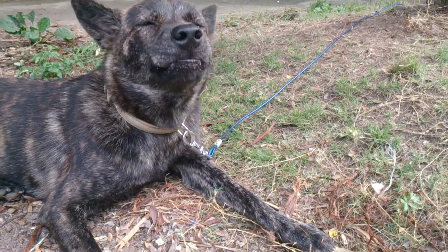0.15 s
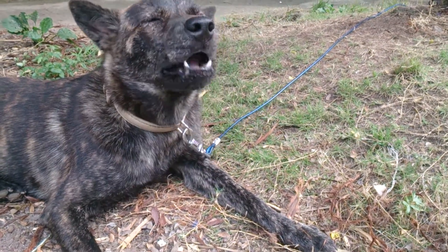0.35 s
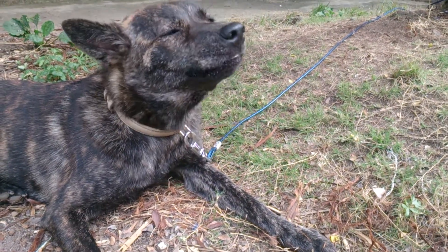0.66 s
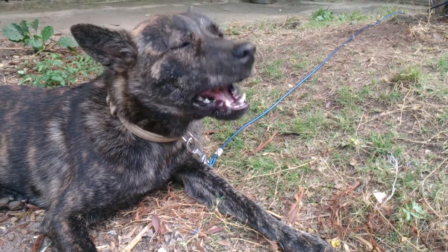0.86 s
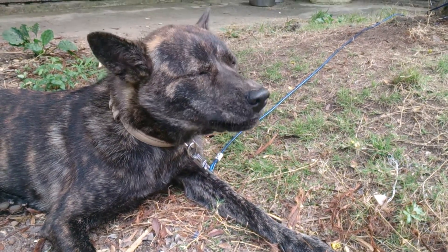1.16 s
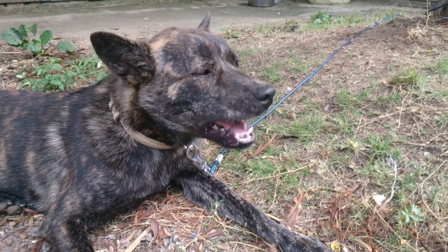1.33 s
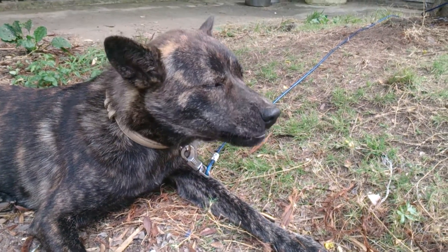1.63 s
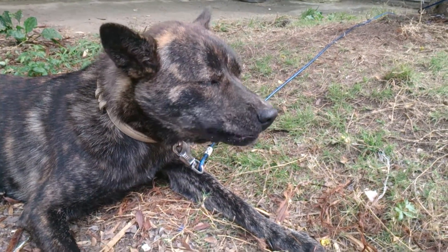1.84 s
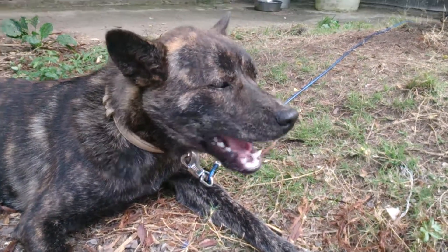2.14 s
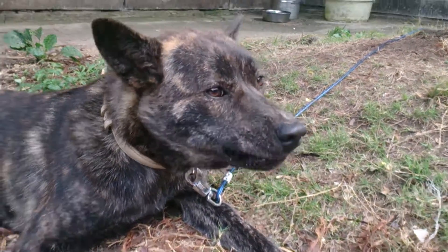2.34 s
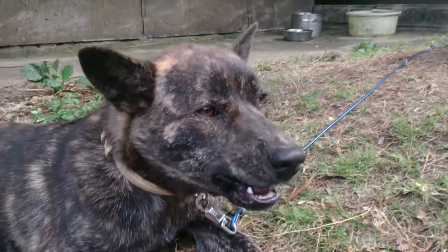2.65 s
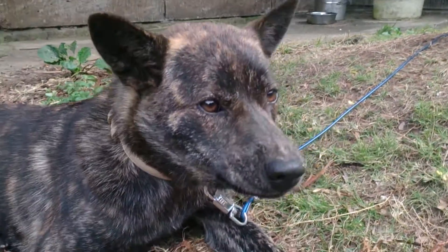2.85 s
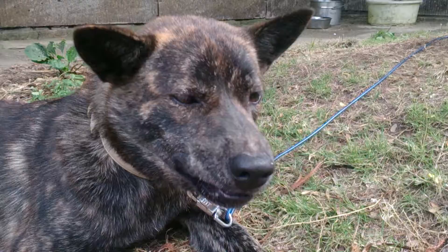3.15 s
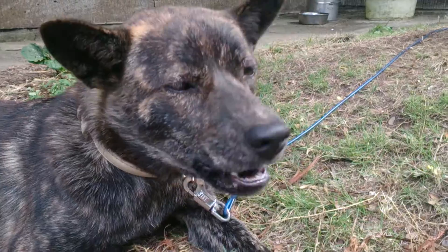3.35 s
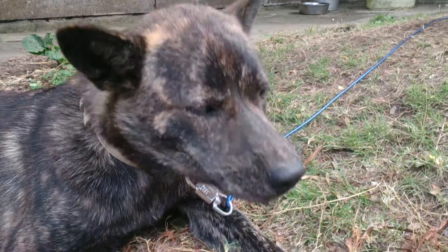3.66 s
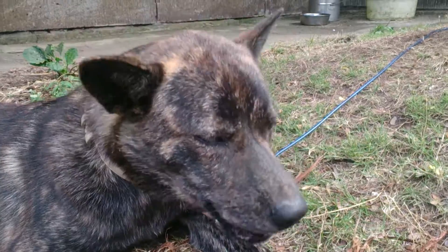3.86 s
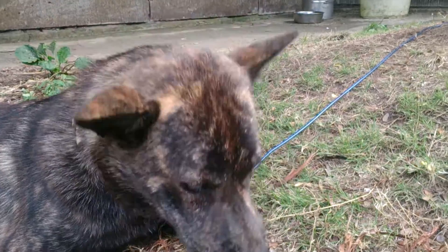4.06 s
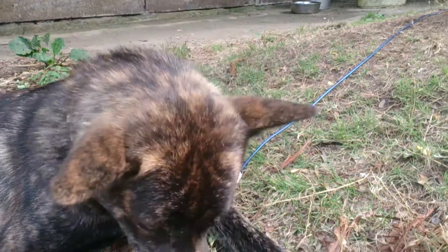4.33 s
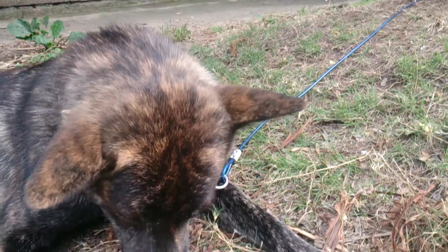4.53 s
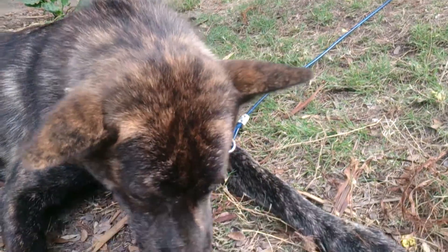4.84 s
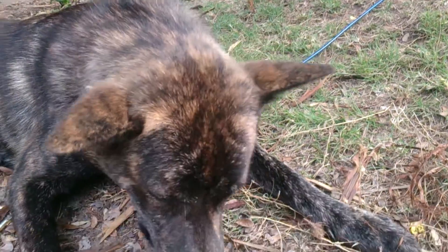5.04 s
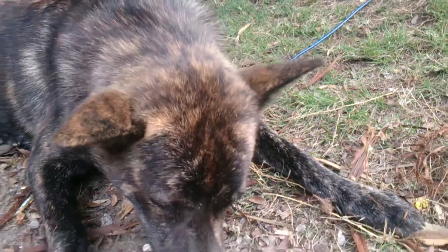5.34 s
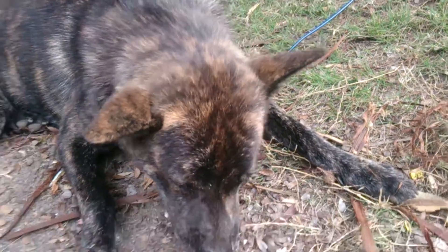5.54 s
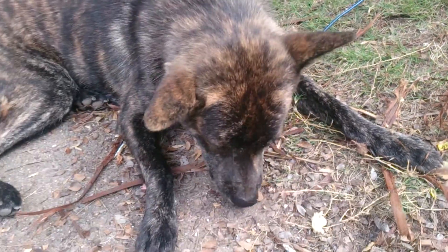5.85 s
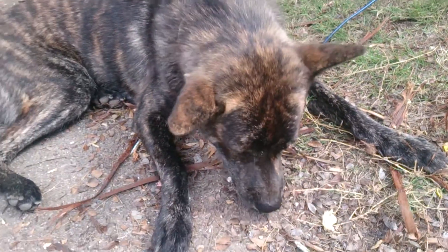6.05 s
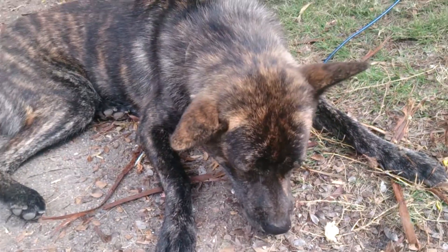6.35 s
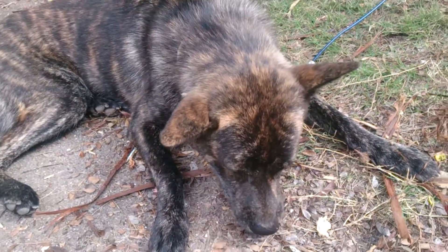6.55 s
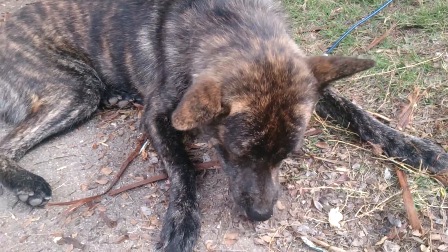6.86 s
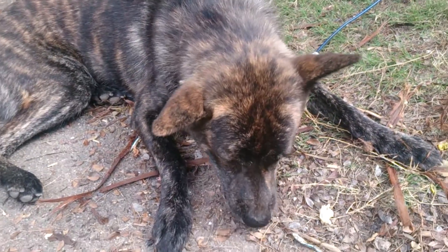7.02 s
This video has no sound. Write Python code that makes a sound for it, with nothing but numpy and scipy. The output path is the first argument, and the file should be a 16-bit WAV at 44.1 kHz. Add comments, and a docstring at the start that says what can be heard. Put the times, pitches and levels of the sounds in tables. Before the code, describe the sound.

Close to the microphone and mostly to the left, a dog chews: a few sharp wet lip smacks in the first couple of seconds, then scattered tongue clicks, tooth ticks, faint squelches and small bumps. Behind it a cicada repeats a short gliding lead-in and shrill rasp about once a second, farther cicadas throb softly, and a second one holds a steady high rasp late on. A faint motor hum and airy hiss lie underneath, in an open yard.

```python
"""Dog chewing among cicadas

A dog lying in a yard chews a scrap close to the left microphone: smacks whistle as the lips part and ring
the mouth; clicks, ticks and soft bumps are short damped tones, squelches bursts of resonant noise.
Around it cicadas sing as buckling noise, filtered into rasps and gliding notes: one in repeated phrases,
a second joining later, and far ones as two throbbing bands. A distant motor hums; outdoor air is shaped noise."""
import sys
import numpy as np
from scipy import signal
from scipy.fft import rfft, irfft
from scipy.io import wavfile
from scipy.ndimage import uniform_filter1d

SR = 44100
rng = np.random.default_rng(int(sys.argv[2]) if len(sys.argv) > 2 else 0)


def linear_from_db(decibels):
    """Turn decibels (scalar or array-like) into linear amplitude factors; 0 gives 1."""
    return 10 ** (np.asarray(decibels, float) / 20)


def log_audio(samples):
    """Write samples as a 16-bit WAV file to the path given in sys.argv[1]."""
    # one column per channel
    frames = np.atleast_2d(samples).T
    # limit to full scale, then quantise
    limited = np.clip(frames, -1, 1)
    pcm = np.round(limited * 32767).astype(np.int16)
    wavfile.write(sys.argv[1], SR, pcm)


N = 317079
TIME = np.arange(N) / SR


def evened(x):
    """Normalisation: scales a signal to rms 1."""
    return x / np.sqrt(np.mean(x ** 2) + 1e-20)


def smooth_noise(size):
    """Slow random fluctuation: noise averaged twice over size samples, at rms 1."""
    once = uniform_filter1d(rng.standard_normal(N), size)
    return evened(uniform_filter1d(once, size))


def read(points, hz):
    """Interpolation of a spectrum along a logarithmic frequency axis."""
    f, value = np.transpose(points)
    return np.interp(np.log(hz + 1), np.log(f + 1), value)


def follow(rows):
    """Linear interpolation in time: one curve for each column after the first."""
    s, *columns = np.transpose(rows)
    return [np.interp(TIME, s, c) for c in columns]


def sides(pan_db):
    """Level-difference stereo: left and right gains, pan_db apart."""
    return linear_from_db(np.multiply.outer([.5, -.5], pan_db))


def resonate(x, hz, width):
    """Heterodyne resonator: shifts the curve hz to zero, applies two equal poles, shifts back; rms 1."""
    turn = np.exp(2j * np.pi * np.cumsum(hz * np.ones(x.shape[-1])) / SR)
    r = np.exp(-np.pi * width / SR)
    smoothed = signal.lfilter([1], np.convolve([1, -r], [1, -r]), x / turn)
    return evened((turn * smoothed).real)


def colour(x, gain):
    """Linear filtering in the frequency domain by gain(hz), then scaling to rms 1."""
    return evened(irfft(rfft(x) * gain(np.fft.rfftfreq(N, 1 / SR)), N))


# shape of the air noise spectrum: f/Hz, relative level/dB
AIR_TONE = [(12, -42), (20, -20), (44, -15.5), (85, -9.5), (144, -6), (191, -12), (274, -14), (491, -23),
            (1100, -26.5), (2610, -16.5), (3260, -18.5), (3900, -16), (5380, -12.5), (9660, -27.5),
            (12800, -22), (15500, -28)]
# likeness of left and right in the air noise: f/Hz, correlation (1 = alike, -1 = opposed)
AIR_LIKENESS = [(60, 1), (120, 0.22), (240, 0.73), (480, 0.4), (950, 0.1), (1890, -0.2), (3770, -0.061),
                (7520, 0.13), (15000, -0.08)]
AIR_DB = -50  # rms


def air():
    """Partly coherent diffuse noise: far traffic, leaves and microphone hiss as random, drifting spectra."""
    frames, hz = N // 256 + 5, np.fft.rfftfreq(1024, 1 / SR)
    a, b, c, d, patches = rng.standard_normal((frames, 513, 5)).T
    patches = evened(uniform_filter1d(uniform_filter1d(patches, 10, 0), 14, 1))
    same = np.clip(read(AIR_LIKENESS, hz), -1, 1)[:, None]
    left, other = a + 1j * b, c + 1j * d
    z = np.array([left, same * left + np.sqrt(1 - same ** 2) * other])
    # the patches shrink towards the bass, which stays more even
    patch_db = 2.1 * patches * np.minimum(hz / 1500, 1)[:, None]
    z *= linear_from_db(read(AIR_TONE, hz)[:, None] + patch_db)
    noise = signal.istft(z, nperseg=1024, noverlap=768)[1][:, :N]
    return linear_from_db(AIR_DB) * evened(noise)


# fundamental of the motor: t/s, f/Hz, level/dB (rms, before panning)
HUM_TRACK = [(0, 144.1, -55), (1, 142.5, -53.5), (2, 144, -55), (3.5, 144, -59), (5, 139.6, -57.5),
             (6.5, 145.3, -55), (7.19, 145.2, -56)]
# fuzzy partners of the hum: multiple of its pitch, level/dB (rms, before panning), pole width/Hz
HUM_OVERTONES = [(2, -70, 8), (3, -79, 10), (1.86, -73, 20)]
HUM_PAN_DB = 4  # left minus right


def hum():
    """Quasi-periodic source: a near-steady motor tone with weak overtones of narrow-band noise."""
    hz, db = follow(HUM_TRACK)
    tone = linear_from_db(db) * np.sqrt(2) * np.sin(2 * np.pi * np.cumsum(hz) / SR)
    fuzz = sum(linear_from_db(d) * resonate(rng.standard_normal(N), k * hz, width) for k, d, width in HUM_OVERTONES)
    return sides(HUM_PAN_DB)[:, None] * (tone + fuzz)


# massed far cicadas: t/s, ringing band level/dB, bright band level/dB (both re rms of sqrt 2)
CHORUS_LEVELS = [(0, -62.5, -63), (.5, -55, -65.5), (1.2, -79, -65), (2.2, -58, -61), (2.9, -81, -63.5),
                 (3.598, -80, -67), (4.7, -62, -62.5), (5.8, -69.5, -64), (6.8, -64, -64.5),
                 (7.19, -79, -68)]
RINGING, BRIGHT = (4950, 1800, -2), (6970, 2650, 8)  # f/Hz, pole width/Hz, left minus right level/dB


def chorus():
    """Incoherent summation: many far cicadas blur into two throbbing bands of noise."""
    out = np.zeros((2, N))
    for db, (hz, width, pan_db) in zip(follow(CHORUS_LEVELS), (RINGING, BRIGHT)):
        level = np.sqrt(2) * linear_from_db(db + 2.7 * smooth_noise(900))
        band = resonate(rng.standard_normal((2, N)), hz, width)
        out += sides(pan_db)[:, None] * level * band
    return out


def buckles(per_s, depth, ring_share=0.14, same=0.022):
    """Amplitude modulation: noise jumps at every buckle of the tymbal and sags until the next."""
    wander = evened(uniform_filter1d(rng.standard_normal(N), 2000))
    turns = np.cumsum(per_s * (1 + 0.0101 * wander)) / SR
    beat = 1 + depth * np.exp(-(turns % 1) / ring_share)
    beat = uniform_filter1d(beat, size=60)  # echoes in the trees round the jump
    left, other = rng.standard_normal((2, N))
    direct = same * np.roll(left, shift=9)  # the part that reaches both ports
    return beat * np.array([left, direct + np.sqrt(1 - same ** 2) * other])


def rasp(level, tone, pan, per_s, depth):
    """Source and filter: buckling noise, coloured for each side, is the shrill part of a cicada song."""
    coloured = colour(buckles(per_s, depth), lambda hz: linear_from_db(read(tone, hz)) * sides(read(pan, hz)))
    return np.sqrt(2) * level * coloured


# spectrum of the unbroken rasp: f/Hz, relative level/dB
STEADY_TONE = [(5000, -30), (8500, -19), (8940, -18.5), (10500, -8.5), (11400, -12), (12100, -6),
               (12700, -4), (15500, -4)]
# its stereo balance: f/Hz, left minus right level/dB
STEADY_PAN = [(9000, 10.5), (12500, -14), (14500, 0)]
DRONE_DB = -47.5  # re rms of sqrt 2
DRONE_FULL_S, DRONE_FADE_S = 4.68, 7.03  # it holds between these times
DRONE_RISE_DB_PER_S, DRONE_FALL_DB_PER_S = 123, 45


def drone():
    """Exponential onset and decay: the unbroken rasp of the second cicada fades in, holds and fades out."""
    rise_db = DRONE_RISE_DB_PER_S * np.maximum(DRONE_FULL_S - TIME, 0)
    fall_db = DRONE_FALL_DB_PER_S * np.maximum(TIME - DRONE_FADE_S, 0)
    level = linear_from_db(DRONE_DB - rise_db - fall_db)
    return rasp(level, STEADY_TONE, STEADY_PAN, per_s=80, depth=0.53)


# fainter rasps, some led in by notes from the further-note table: start t/s, end t/s,
# level/dB (re rms of sqrt 2)
FAINT_RASPS = [(0.57, 0.784, -56), (0.803, .92, -64), (1.41, 1.86, -57.5), (2.332, 2.45, -52),
               (2.715, 2.92, -55), (2.93, 3.19, -57.5), (3.36, 4.3, -58)]
# phrases of the near cicada, also led in by the notes below: rasp start t/s, rasp length t/s,
# rasp level/dB (re rms of sqrt 2), lead-in level/dB, share of the full glide
SONG_PHRASES = [(0.942, .14, -46, -59, .6), (2.064, 0.17, -47, -58.5, 0.71),
                (3.198, 0.17, -46.5, -56.5, 0.88), (4.314, 0.15, -46.5, -60.5, 0.84),
                (5.342, 0.17, -45.5, -59, 1), (6.426, 0.16, -45.5, -59, 0.89)]
# spectrum of these rasps: f/Hz, relative level/dB
RASP_TONE = [(5000, -50), (8500, -20), (9590, -17), (10200, -9), (11200, -17), (12200, -9.5), (13500, -7.5),
             (15500, -7.5)]
# their stereo balance: f/Hz, left minus right level/dB
RASP_PAN = [(9000, 9.5), (12500, -13.5), (15000, 4)]
BURST_FADE_DB_PER_S = 142


def bursts():
    """Reverberant decay: each rasp is on within a few ms, holds, then fades through the trees."""
    rasps = FAINT_RASPS + [(s, s + length, db) for s, length, db, *_ in SONG_PHRASES]
    power = np.zeros(N)
    for start, end, db in rasps:
        fade_db = BURST_FADE_DB_PER_S * np.maximum(TIME - end, 0)
        power += (TIME > start) * linear_from_db(2 * (db - fade_db))
    level = np.sqrt(abs(uniform_filter1d(power, 200)))
    return rasp(level, RASP_TONE, RASP_PAN, per_s=138, depth=0.43)


# further notes: some lead into rasps, faint or loud, others sound over or between them:
# start t/s, length t/s, starting f/Hz, level/dB (re rms of sqrt 2)
FURTHER_NOTES = [(0.003, 0.19, 1860, -63.5), (0.213, .16, 6330, -57.5), (0.35, 0.27, 1970, -62),
                 (0.296, 0.13, 4500, -65), (1.248, 0.18, 7160, -58.5), (1.33, 0.088, 4350, -53.5),
                 (2.17, 0.097, 2200, -57.5), (1.36, 0.28, 1650, -67.5), (2.493, 0.25, 1750, -64.5),
                 (3.132, 0.11, 2470, -68), (3.204, 0.16, 7450, -54), (4.323, 0.177, 6500, -57),
                 (4.52, .07, 1850, -72), (4.856, 0.28, 2400, -65.5), (5.26, 0.1, 6960, -56.5),
                 (6.18, 0.076, 2710, -57.5), (6.216, 0.17, 6950, -53)]
# notes held under the rasp and after it, in separate puffs: start t/s, end t/s, starting f/Hz, ending f/Hz,
# level/dB (re rms of sqrt 2)
CLOSING_NOTES = [(0.976, 1.11, 4250, 4250, -61), (2.14, 2.25, 4100, 4100, -58.5),
                 (2.275, 2.326, 4000, 4400, -58), (3.267, 3.353, 4300, 4100, -58.5),
                 (3.37, 3.46, 4160, 4290, -62), (4.4, 4.488, 4050, 3900, -56),
                 (4.5, 4.728, 3720, 3880, -58), (5.46, 5.55, 3950, 4030, -60),
                 (5.535, 5.665, 3720, 4050, -59), (6.52, 6.63, 4100, 3900, -62),
                 (6.64, 6.745, 4080, 4450, -59.5)]
# notes that lead into the rasp of each phrase: start t/s and end t/s re rasp start, full glide from f/Hz,
# to f/Hz, pole width/Hz, level/dB re the phrase's lead-in level
LEAD_IN_NOTES = [(-0.22, 0.014, 5530, 5540, 900, 6), (-0.18, 0.016, 3020, 4800, 600, 3.5),
                 (-.15, 0.037, 1300, 3100, 400, -1)]
NOTE_RISE, NOTE_WIDTH = 0.074, 0.38  # shares of a further note's starting pitch
LEAD_SWELL, NOTE_SWELL, CLOSING_SWELL = 0.64, 0.25, .3  # shares of a note's length spent swelling
CLOSING_WIDTH_HZ = 170


def sung():
    """Frequency glides: all notes as (start s, end s, start Hz, end Hz, width Hz, dB, swelling share)."""
    rows = []
    for s, length, hz, db in FURTHER_NOTES:
        rows.append((s, s + length, hz, hz * (1 + NOTE_RISE), hz * NOTE_WIDTH, db, NOTE_SWELL))
    for a, b, start_hz, end_hz, db in CLOSING_NOTES:
        rows.append((a, b, start_hz, end_hz, CLOSING_WIDTH_HZ, db, CLOSING_SWELL))
    for s, _, _, lead_db, glide in SONG_PHRASES:
        for a, b, low_hz, high_hz, width, db in LEAD_IN_NOTES:
            # a smaller glide keeps its middle pitch
            middle, half = (low_hz + high_hz) / 2, glide * (high_hz - low_hz) / 2
            rows.append((s + a, s + b, middle - half, middle + half, width, lead_db + db, LEAD_SWELL))
    return rows


def notes():
    """Driven resonance: buckles ring an air sac of gliding pitch; notes swell and stop unevenly."""
    drive, out = buckles(200, 0.59), np.zeros((2, N))
    for a, b, start_hz, end_hz, width, db, share in sung():
        part = slice(round(a * SR), round(b * SR))
        u = np.linspace(0, 1, part.stop - part.start)
        swell = np.minimum(u / share, 1) * np.minimum((1 - u) / 0.064, 1)
        tone = resonate(drive[:, part], start_hz + (end_hz - start_hz) * u, width)
        out[:, part] += np.sqrt(2) * linear_from_db(db) * swell * tone
    return linear_from_db(1.4 * smooth_noise(500)) * out


def add(mix, s, sound):
    """Superposition: mixes a sound in at time s."""
    part = mix[round(s * SR):][:len(sound)]
    part += sound[:len(part)]


def place(mix, s, sound, pan_db):
    """Time and level differences: the left port leads; the microphone body shades treble more than bass."""
    pair = sides(pan_db) / sides(pan_db).mean()
    bass = signal.lfilter(*signal.butter(N=1, Wn=900, fs=SR), sound)
    add(mix[0], s, pair[0] * sound)
    add(mix[1], s + 0.00022, pair[1] * sound + 0.37 * (pair[0] - pair[1]) * bass)


# soft grainy squelches: start t/s, end t/s, f/Hz, level/dB (before the fades and panning)
SQUELCH_EVENTS = [(0.822, 0.827, 900, -55), (3.617, 3.63, 1290, -59), (3.883, 3.966, 1320, -61),
                  (3.94, 3.968, 1700, -59), (4.81, 4.878, 940, -58.5), (5.116, 5.164, 1430, -63),
                  (5.184, 5.242, 850, -63), (6.177, 6.182, 750, -51.5)]


def squelches(mix):
    """Cavity resonance: saliva bubbles crowd together as lumpy noise in the mouth."""
    noise = rng.standard_normal(N)
    for a, b, hz, db in SQUELCH_EVENTS:
        lumps = noise[round(a * SR):round(b * SR)] ** 3
        sound = linear_from_db(db) * resonate(lumps, hz, 380) * signal.windows.tukey(len(lumps), .5)
        place(mix, a, sound, pan_db=12)


def click(db, hz):
    """Damped oscillation: a bubble or bump swells and dies, high ones over more cycles, with a rising snap."""
    t = np.arange(1500) / SR
    u = t * hz / (0.11 + hz / 2500)
    snap = .5 * np.exp(-u) * np.sin(2 * np.pi * 1.1 * hz * t * (1 + 0.74 * u))
    return linear_from_db(db) * u * np.exp(1 - u) * (np.sin(2 * np.pi * hz * t) + snap)


# tongue and saliva clicks, bumps on the ground: t/s, envelope level/dB (before panning), f/Hz,
# left minus right treble level/dB
CLICK_EVENTS = [(1.551, -40, 1620, 8), (1.6378, -31, 8600, 20), (1.6399, -27, 5500, 18),
                (2.153, -46, 900, 17), (2.311, -47.5, 980, 18), (2.354, -44, 2230, 17),
                (2.589, -43.5, 1330, 9), (2.631, -48.5, 855, 20), (3.025, -48, 1260, 10),
                (3.049, -39, 1460, 8), (3.175, -36, 5300, 5), (3.184, -48, 1470, 15), (3.443, -41, 1230, 7),
                (3.798, -40.5, 1360, 7), (4.265, -45, 4000, 8), (4.281, -33.5, 2560, 8),
                (5.462, -43, 1494, 6.5), (5.52, -47, 1200, 10), (5.558, -42, 1440, 11),
                (5.669, -39.5, 550, 13), (5.673, -39.5, 1040, 8), (5.675, -43, 600, 13),
                (5.6762, -40.5, 2670, 13), (5.6803, -36, 510, 13), (5.6865, -48, 805, 10),
                (6.1924, -27, 1530, 11), (6.195, -44, 3030, 10), (6.922, -44, 1515, 9),
                (6.923, -51, 2300, 11), (6.984, -40, 2360, 15)]


def clicks(mix):
    """Impulsive excitation: each click or bump is a single damped tone."""
    for s, db, hz, pan_db in CLICK_EVENTS:
        place(mix, s, click(db, hz), pan_db)


# dry ticks of the teeth: t/s, envelope level/dB, f/Hz, lower ring level/dB (levels before panning),
# left minus right treble level/dB
TICK_EVENTS = [(.9459, -34.5, 7500, -33.5, 2), (2.742, -30, 6570, -50, 15), (4.284, -38, 5600, -42, 5),
               (5.9997, -34, 5600, -44, -9)]
# rings that come with a tick: multiple of its pitch, level/dB re tick
TICK_RINGS = [(1.4, -9), (1.7, -12.5), (2.3, -20), (.3, -26)]


def ticks(mix):
    """Modal superposition: teeth tick as several inharmonic damped tones at once."""
    for s, db, hz, lower_db, pan_db in TICK_EVENTS:
        sound = click(db, hz) + click(lower_db, 0.67 * hz)
        sound += sum(click(db + d, k * hz) for k, d in TICK_RINGS)
        place(mix, s, sound, pan_db)


def ring(hz, db, t60, t):
    """Exponential decay: one mode, down 60 dB after t60 seconds."""
    return linear_from_db(db - 60 * t / t60) * np.sin(2 * np.pi * hz * t)


# mouth rings after a smack: f/Hz, level/dB re smack level, decay time t60/s
MOUTH_RINGS = [(1610, -11, 0.0084), (2430, -9.5, 0.0047), (2940, -13, 0.0043), (7100, -2, 0.0019),
               (9050, -6.5, 0.0032), (10300, -15, .002), (14000, -18, 0.004), (87, -4.5, 0.0045)]
WHISTLE_RISE_S, WHISTLE_OPEN_S = .0005, .0021
WHISTLE_SAG = .22  # share of pitch lost as the gap shuts
AFTER_HZ, AFTER_DB, AFTER_PEAK_S = 4050, -25, 0.0064  # late ring, level re smack level


def smack(db, whistle_hz, cavity_hz, cavity_db):
    """Aperture whistle: the wet gap drops to pitch as it opens and sags as it shuts; the mouth rings on."""
    t = np.arange(3000) / SR
    gap = 1 / (1 + np.exp(np.minimum((t - WHISTLE_OPEN_S) / 0.00012, 50)))  # 1 open, 0 shut
    drop = 1 + 0.22 * np.exp(-t / 0.00024)
    sag = 1 - WHISTLE_SAG * (1 - gap) ** 4
    turns = np.cumsum(whistle_hz * drop * sag) / SR
    body = gap * np.exp(-(t / 0.0026) ** 2)
    remnant = 0.14 * (1 - gap) * np.exp(-(t / 0.0025) ** 4)
    whistle = (1 - np.exp(-t / WHISTLE_RISE_S)) * (body + remnant) * np.sin(2 * np.pi * turns)
    mouth = sum(ring(f, d, t60, t) for f, d, t60 in MOUTH_RINGS) + ring(cavity_hz, cavity_db, 0.012, t)
    mouth = (1 - np.exp(-t / 0.00018)) * mouth
    late_swell = linear_from_db(AFTER_DB) * np.exp(-((t - AFTER_PEAK_S) / 0.0043) ** 4)
    late = late_swell * np.sin(2 * np.pi * AFTER_HZ * t)
    return linear_from_db(db) * (whistle + mouth + late)


# lips snapping apart: t/s, level/dB (before panning), whistle f/Hz, mouth cavity f/Hz,
# cavity level/dB re smack level, left minus right treble level/dB
SMACK_EVENTS = [(.8552, -29.5, 4900, 1000, -16, 5), (1.6374, -19, 5350, 780, -11, 20),
                (1.821, -13, 5380, 980, -20, 27), (2.0146, -32, 5350, 880, -6.5, 21),
                (2.253, -20.5, 5350, 890, -10, 28)]


def smacks(mix):
    """Transient radiation: each parting of the lips is one whistle with its rings."""
    for s, db, whistle_hz, cavity_hz, cavity_db, pan_db in SMACK_EVENTS:
        place(mix, s, smack(db, whistle_hz, cavity_hz, cavity_db), pan_db)


# echoes off paws and soil: delay t/s, level/dB re the dulled direct sound
GROUND_ECHOES = [(.0037, -21), (.0049, -17.5), (.0066, -21), (.0092, -19)]


def dog():
    """Early reflections: all chewing sounds with close echoes of alternating sign."""
    mix = np.zeros((2, N))
    for layer in (smacks, clicks, ticks, squelches):
        layer(mix)
    dull = signal.lfilter(*signal.butter(N=4, Wn=3000, fs=SR), mix)  # soft ground swallows the treble
    echoes = np.zeros((2, N))
    for k, (s, db) in enumerate(GROUND_ECHOES):
        echoes += (-1) ** k * linear_from_db(db) * np.roll(dull, round(s * SR), axis=1)
    return signal.lfilter(*signal.butter(N=2, Wn=70, btype="high", fs=SR), mix + echoes)


def scene():
    """Linear superposition of air, motor, cicadas and dog."""
    return air() + hum() + chorus() + drone() + bursts() + notes() + dog()


def band_limit(x):
    """A steep low-pass at the top of the band."""
    return signal.sosfilt(signal.butter(12, 16670, fs=SR, output="sos"), x)


def record(dry):
    """Band limitation: a linear-phase low-pass at 15570 Hz."""
    lowpass = signal.firwin(511, 15570, window=("kaiser", 9), fs=SR)
    limited = signal.oaconvolve(dry, lowpass[None], "same")
    return band_limit(limited)


dry = scene()
out = record(dry)
log_audio(out)
```